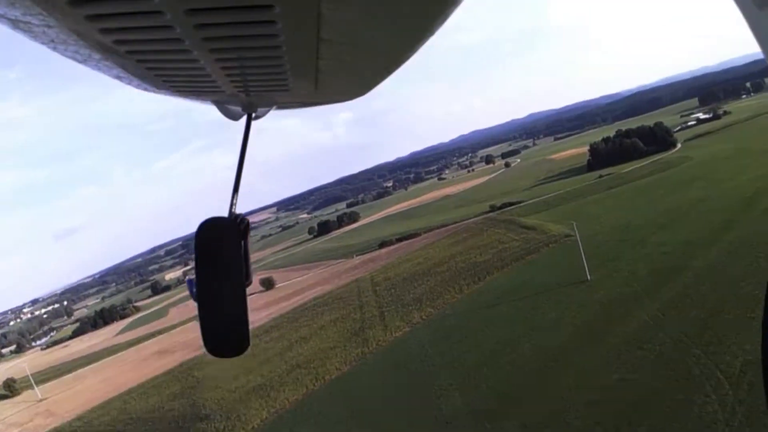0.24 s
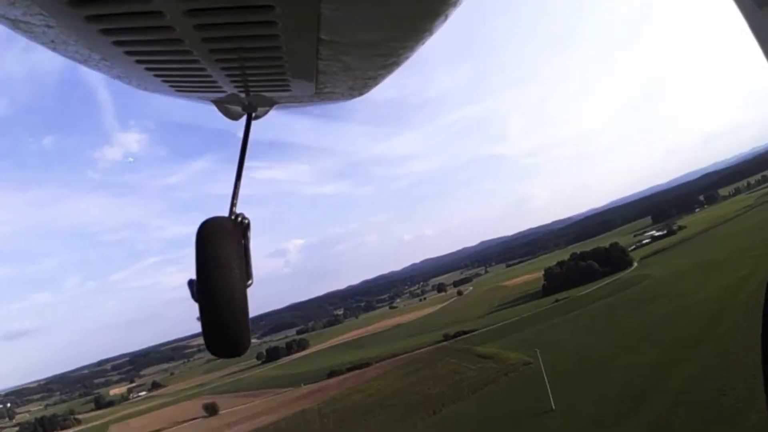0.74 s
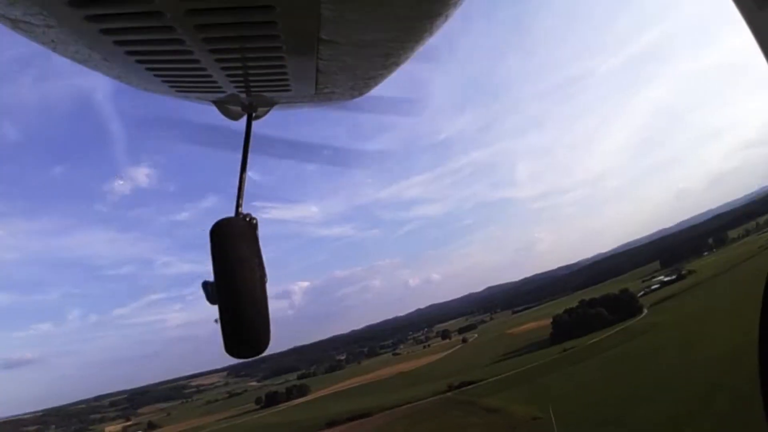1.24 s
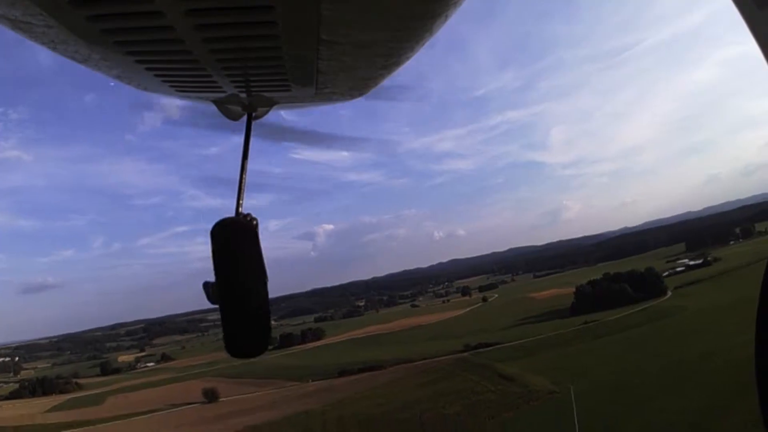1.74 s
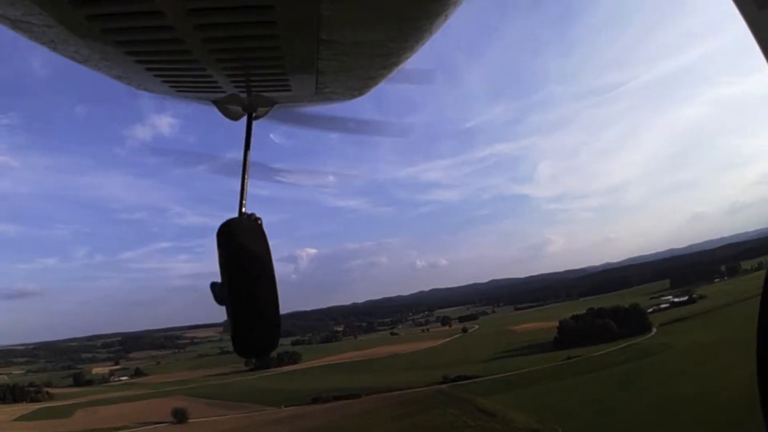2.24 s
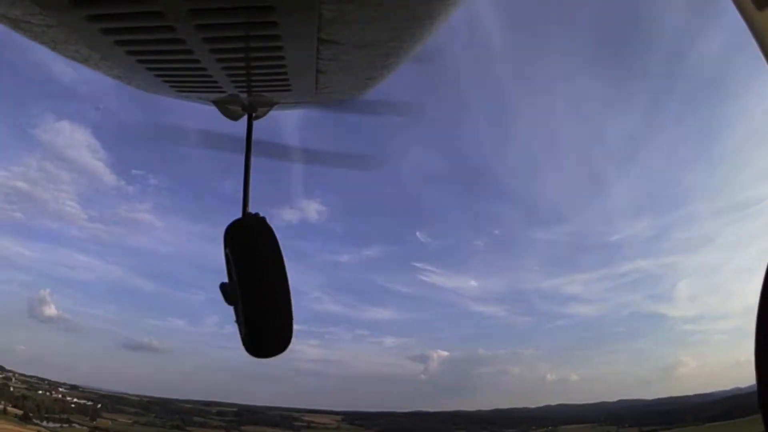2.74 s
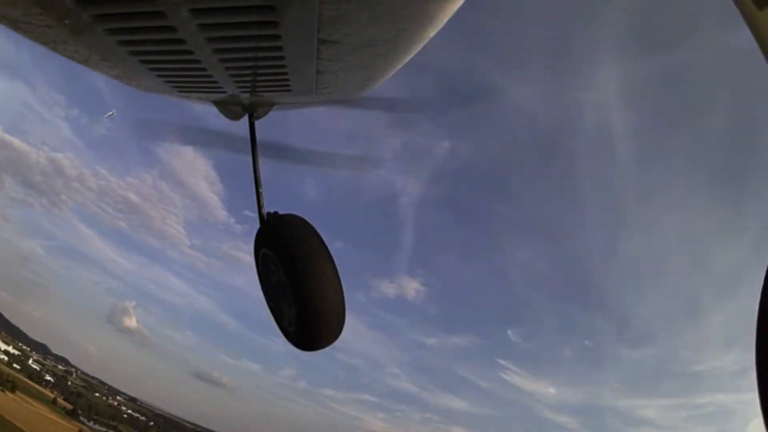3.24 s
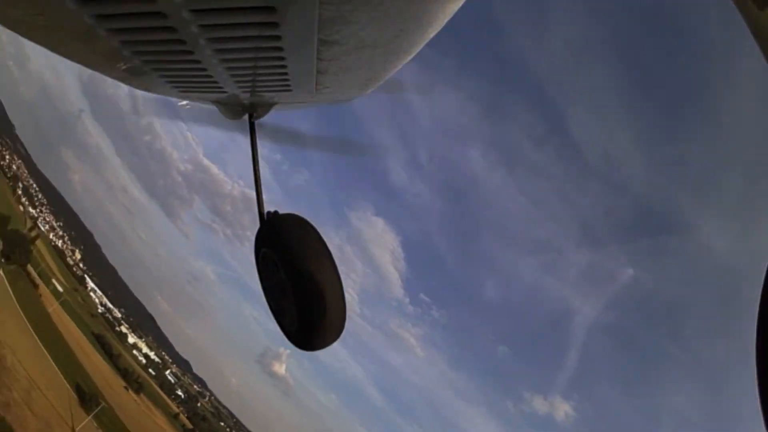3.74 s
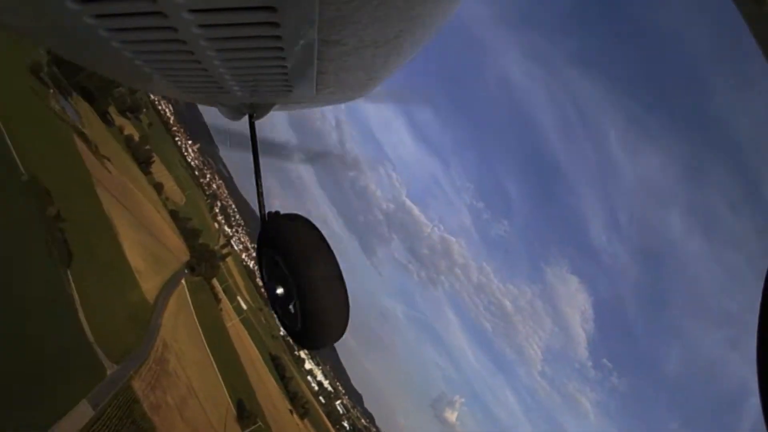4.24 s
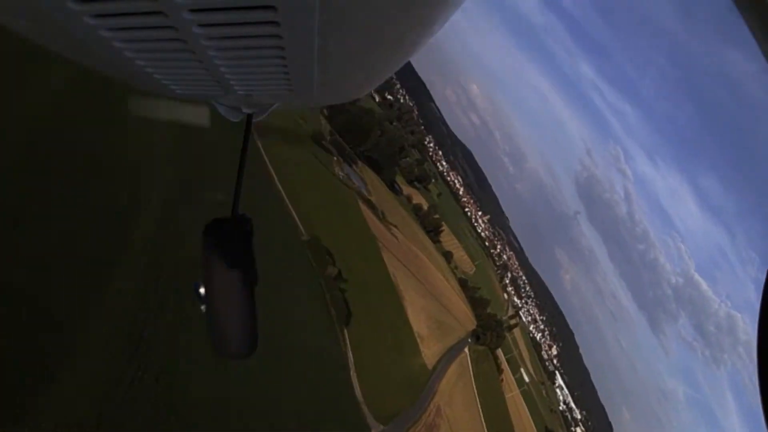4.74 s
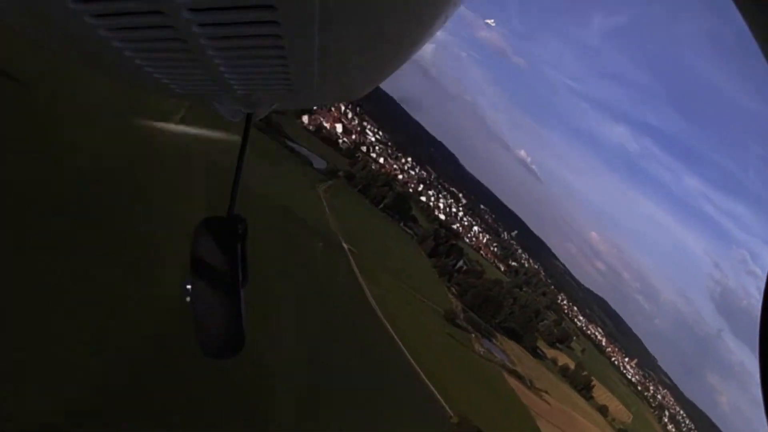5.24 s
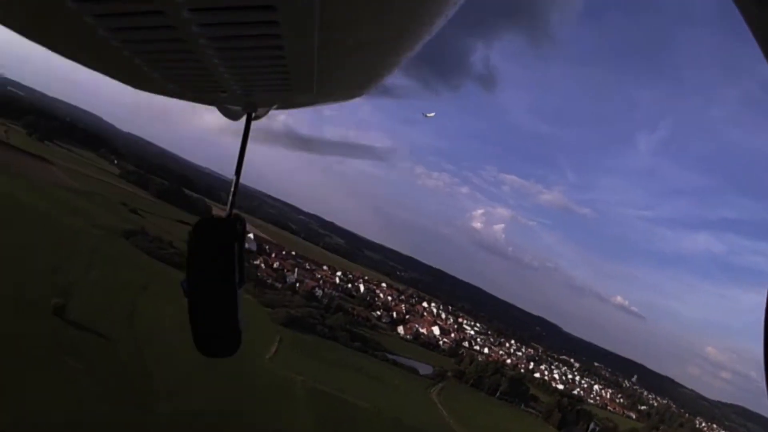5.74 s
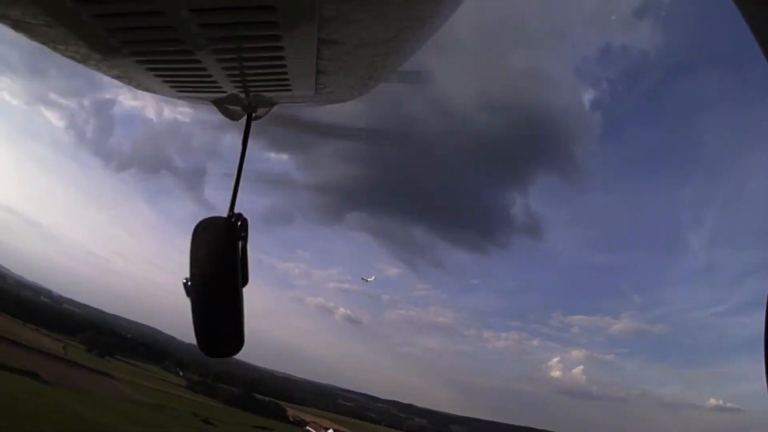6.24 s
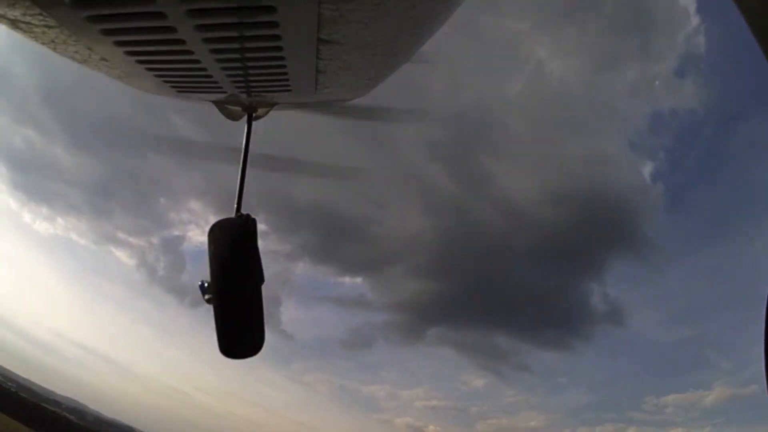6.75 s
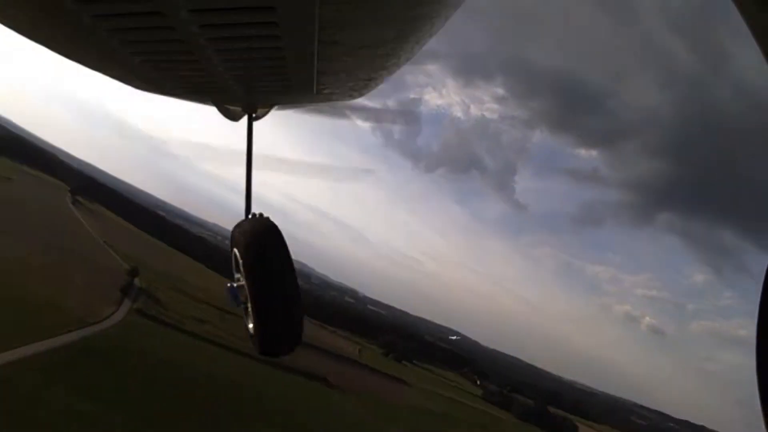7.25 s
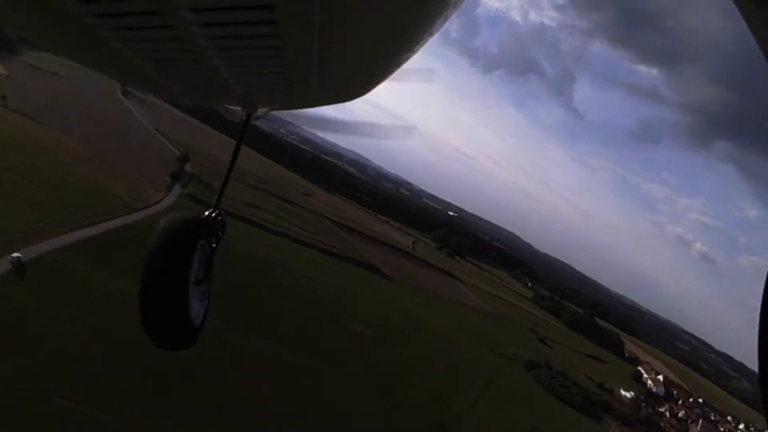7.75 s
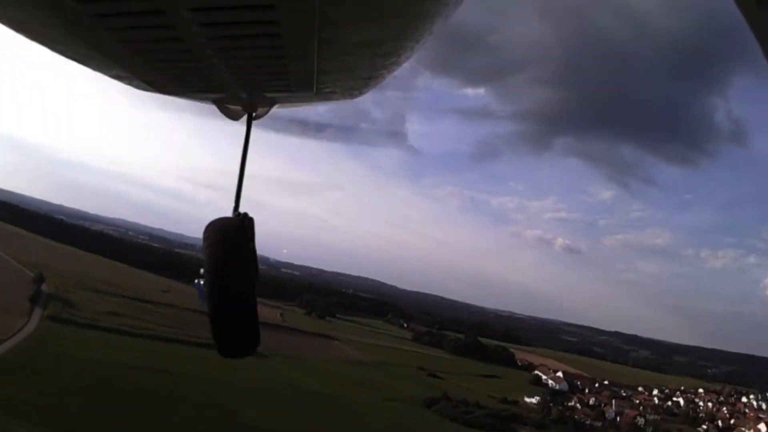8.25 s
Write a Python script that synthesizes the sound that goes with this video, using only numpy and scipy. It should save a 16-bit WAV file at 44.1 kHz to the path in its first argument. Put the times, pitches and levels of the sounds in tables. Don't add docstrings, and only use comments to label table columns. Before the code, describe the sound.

In open air, a small microphone fixed just behind a model plane's propeller picks up a dense, steady electric drone at full throttle, low and buzzing with a metallic whine on top, under rumbling, hissing wind. It holds until about 3 s, then the pitch slides down, the blades soften and the air noise thins. Small dry ticks patter around 3.3 to 3.7 s while a thin, constant high whistle emerges. The drone is slowest around 4.5 to 4.7 s; from 4.2 to 4.95 s a loose part buzzes in a harsh, bright, irregular rattle, by far the sharpest sound. From about 4.8 s the motor climbs modestly, blades and wind growing fuller, and holds from 6.3 s. A duller, weaker rattle comes at 7.3 to 7.8 s. Then the pitch rises again, the whistle fades and the wind surges to the end at 8.5 s, still just below its opening pitch.

```python
import sys
import numpy as np
from scipy import signal
from scipy.fft import rfft, irfft
from scipy.io import wavfile
from scipy.ndimage import uniform_filter1d

SR = 44100
rng = np.random.default_rng(int(sys.argv[2]) if len(sys.argv) > 2 else 0)


def persist_wave(psi):
    counts = np.round(np.clip(psi, -1, 1) * 32767).astype(np.int16)
    wavfile.write(sys.argv[1], SR, np.atleast_2d(counts).T)


def invert_db(x):
    u = np.asarray(x, float) / 20
    return 10 ** u


N = 374850

SWITCH_HZ = 7840.0
FULL_SPEED = 150

# start_s, speed [turns per s]
THROTTLE = [(0, 150.67), (2.767, 150.3), (3.06, 149.95), (3.258, 131.97), (3.385, 123.91), (3.652, 123.47),
            (3.955, 116.16), (4.511, 110.13), (4.805, 122.17), (4.964, 123.72), (5.483, 122.53),
            (5.76, 128.2), (6.138, 128.21), (6.306, 132.97), (7.189, 131.87), (7.67, 132.13),
            (7.866, 142.66), (8.5, 144.4)]
# start_s, level_db
BLADE_LOAD = [(0, -33), (1.8, -39), (2.6, -36.5), (2.9, -47), (3.5, -51), (3.85, -55.5), (4.3, -64),
              (4.6, -52), (4.85, -52), (5.0, -49), (5.45, -39), (5.8, -37.5), (6.5, -42.5), (6.95, -40),
              (7.9, -43), (8.2, -37), (8.5, -41.5)]
# pitch_hz, level_db
UNBALANCE = [(113, -42.5), (117, -53), (121, -75), (123, -53), (127.5, -40), (131, -39), (134, -37.5),
             (150, -39)]
# pitch_hz, level_db
FOURTH = [(450, -57.5), (490, -58), (530, -56.5), (570, -53), (600, -54)]
# pitch_hz, level_db
SIXTH = [(680, -52.5), (720, -58), (765, -72), (795, -57), (830, -77), (860, -45), (880, -63), (900, -57)]
# pitch_hz, width_hz, gain_db
AIRFRAME = [(1421, 68, 9.5), (1634, 120, 2.5), (1727, 170, -3.5), (1990, 150, -15), (2616, 155, -3.5),
            (3220, 330, -10.5), (5490, 330, 3)]
# start_s, level_db
WHISTLE = [
    (2.9, -95),
    (3.1, -67),
    (3.2, -56),
    (3.33, -48.5),
    (3.55, -44.8),
    (4.2, -41.7),
    (6.6, -46.4),
    (7.7, -46.2),
    (8.5, -58),
]
# start_s, end_s, rate [taps per s], level_db
BUZZ = [(4.194, 4.21, 140, -33), (4.23, 4.25, 130, -30), (4.254, 4.274, 290, -31), (4.299, 4.301, 230, -27),
        (4.331, 4.345, 280, -24.5), (4.347, 4.367, 300, -34), (4.374, 4.404, 41, -25),
        (4.425, 4.44, 240, -37), (4.438, 4.498, 290, -22.5), (4.498, 4.516, 120, -30),
        (4.519, 4.613, 340, -23.5), (4.61, 4.709, 315, -23), (4.71, 4.752, 200, -33),
        (4.734, 4.81, 270, -24), (4.799, 4.88, 290, -24), (4.89, 4.948, 110, -37),
        (7.278, 7.392, 160, -30.5), (7.37, 7.418, 186, -30), (7.433, 7.522, 140, -31),
        (7.566, 7.646, 184, -31), (7.662, 7.704, 160, -36), (7.754, 7.804, 143, -30),
        (7.394, 7.683, 110, -35)]
# pitch_hz, width_hz, level_db
TAP_LOW = [(1410, 200, -2.5), (2370, 500, -6.5), (3120, 360, -1)]
# pitch_hz, width_hz, level_db
TAP_HIGH = [(5440, 1200, -12), (7950, 630, -4), (9430, 1000, -17)]
# start_s, level_db
TICKS = [(3.318, -46), (3.334, -48), (3.418, -47), (3.45, -48), (3.478, -47), (3.513, -47), (3.65, -52),
         (3.7, -52)]
# pitch_hz, width_hz, level_db
TICK_RING = [(5050, 350, 6), (5700, 500, 2)]
# pitch_hz, level_db [dB per Hz]
RUMBLE = [(20, -58), (35, -58), (100, -57), (180, -62), (280, -64), (380, -67), (520, -72), (750, -82),
          (1150, -76.5), (1480, -78), (1700, -88), (1950, -92)]
# pitch_hz, level_db [dB per Hz]
HOUSING = [(2350, -93.5), (2700, -84), (3150, -87), (3500, -94.5), (4900, -99.5), (5450, -90.5),
           (6900, -98), (7700, -88.5), (8300, -100.5), (8800, -102), (9600, -102), (10800, -103),
           (11700, -117), (12600, -125)]
AIR_EDGES_HZ = [12, 200, 750, 1900, 8600, 14000]
# start_s, level_db
AIRFLOW = [(0, .5), (.45, -1), (.9, 2), (1.38, 1.5), (1.62, -1), (2.5, 1.3), (2.78, -4), (3.35, -3.5),
           (3.74, -8), (4.45, -9), (4.95, -7), (5.45, -2), (6.3, -0.7), (6.95, -2), (7.3, -6.5),
           (7.65, -7.5), (8.1, 2.5), (8.5, 3.5)]
# share of airflow, rise [dB per turn per s]
AIR_FOLLOWS = [
    (0.58, 0.05),
    (0.75, 0.26),
    (0.36, 0.1),
    (1.07, 0.07),
    (0.37, 0.06),
]
# pitch_hz, floor_db [dB per Hz], extra_db under the whistle
GATE = [(8490, -112, 13), (8460, -101, 14), (9240, -104, 4), (9750, -105, 0.5), (11140, -106, 0.5),
        (11260, -110, -2), (11860, -112, -1), (11800, -112, -5), (12500, -112, -8)]


def propeller(turns, speed):
    blade, = in_time(BLADE_LOAD)
    fourth = at_hz(FOURTH, 4 * speed) + 2.6 * drift(2.3)
    sixth = at_hz(SIXTH, 6 * speed) + 0.85 * np.maximum(blade + 37, -20)
    orders = {
        1: at_hz(UNBALANCE, speed),
        2: blade,
        3: -47.5 + 0.48 * (speed - FULL_SPEED),
        4: fourth,
        5: fourth - 13,
        6: sixth,
        7: fourth - 9 - 0.18 * (speed - 120) + 1.3 * drift(5.4),
        8: fourth - 6 + 0.43 * (blade + 37),
        10: fourth - 11,
    }
    return sum(tone(k * turns, level_db, waver_db=0.73, rate=5.4) for k, level_db in orders.items())


def motor(turns, speed, whistle):
    ripple_db = 1.2 * switching_depth(whistle)
    floor_db = -71
    teeth = np.maximum(-57.5 + ripple_db + airframe(12 * speed), floor_db)
    magnets = np.maximum(-55.5 + ripple_db + airframe(14 * speed), floor_db - 3)
    steady_db = -67 - np.clip(2.5 * (FULL_SPEED - speed), 0, 7.5)
    commutation = np.maximum(-61 + airframe(42 * speed), steady_db)
    orders = {12: teeth, 14: magnets, 28: magnets - 14, 31: magnets - 24, 35: magnets - 29,
              42: commutation, 84: magnets - 26}
    orders.update({24.66: -79, 29.51: magnets - 17, 33.52: magnets - 26})
    return sum(tone(k * turns, level_db, waver_db=1.0) for k, level_db in orders.items())


def controller(turns, speed, whistle):
    depth_db = switching_depth(whistle) - 0.17 * (in_time(BLADE_LOAD)[0] + 70)
    beat_84 = -46.5 + depth_db + airframe(84 * speed - SWITCH_HZ)
    beat_42 = -49.5 + depth_db + airframe(SWITCH_HZ - 42 * speed)
    switch = SWITCH_HZ * np.arange(N) / SR
    out = tone(switch, whistle, waver_db=0.28)
    out += tone(84 * turns - switch, beat_84)
    out += tone(switch - 42 * turns, beat_42)
    for order, below_db in {-1: -28, 1: -32, 2: -35, 29: -60}.items():
        out += tone(switch + order * turns, whistle + below_db, waver_db=4.0, rate=2.5)
    return out + invert_db(whistle - 25) * resonate(rng.standard_normal(N), [(7650, 700, 2)])


def buzz(turns, speed):
    low, edge, high = np.zeros((3, N))
    for start, end, per_s, level_db in BUZZ:
        chance = rng.standard_normal((60, 2))
        count = np.arange(60)
        s = start + (count + 0.19 * chance[:, 0] * (count > 0)) / per_s
        s = s[s < end]
        at = (s * SR).astype(int)
        swell_db = 3.2 * (np.sin(np.pi * (s - start) / (end - start)) - 0.7)
        blade_db = 1.0 * np.cos(4 * np.pi * turns[at])
        blow = invert_db(level_db + swell_db + 2.65 * chance[:len(at), 1] + blade_db)
        low[at] += blow
        edge[at] += blow * invert_db(0.33 * (speed[at] - 142.5))
        high[at] += blow * invert_db(-12.5 - 0.23 * (speed[at] - speed.min()))
    grit = rng.standard_normal(N)

    def scrape(taps):
        return grit * signal.lfilter([1], [1, -np.exp(-1 / (0.0011 * SR))], taps)

    body = resonate(3.5 * low + 0.31 * scrape(low), TAP_LOW)
    body = body + invert_db(1.5) * band(0.29 * edge + 0.63 * scrape(edge), [3140, 4510])
    inner = band(body + resonate(scrape(high), TAP_HIGH), [1150, 9450])
    top = band(scrape(high), [11000, 12600])
    return invert_db(1.0) * inner + invert_db(-20) * top


def ticks():
    clicks = np.zeros(N)
    s, level_db = np.transpose(TICKS)
    clicks[(s * SR).astype(int)] = invert_db(level_db + 12)
    return resonate(clicks + 1e-18, TICK_RING)


def airflow(turns, speed):
    hz = np.maximum(np.fft.rfftfreq(N, 1 / SR), 1)
    points = np.array([(8, -77), *RUMBLE, *HOUSING, (14000, -140)])
    colour_db = np.interp(np.log(hz), np.log(points[:, 0]), points[:, 1])
    spectrum = rfft(rng.standard_normal(N)) * invert_db(colour_db) * np.sqrt(SR / 2)
    gust = drift(0.37)
    blades = np.cos(4 * np.pi * turns) + 0.81 * np.cos(2 * np.pi * turns)
    below = [1 / (1 + (hz / edge) ** 8) for edge in AIR_EDGES_HZ]
    flow, = in_time(AIRFLOW)
    flutter_db = [0.57, 0.5, 0.95, 0.69, 0.87]
    pulse_db = [0.16, 0.7, 0.15, 0.36, 0.4]
    out = 0
    for k, (share, per_speed) in enumerate(AIR_FOLLOWS):
        level_db = share * flow + per_speed * (speed - FULL_SPEED)
        region = irfft(spectrum * np.sqrt(below[k + 1] - below[k]), N)
        flicker_db = 0.5 * gust + flutter_db[k] * drift(15.0) + pulse_db[k] * blades
        out = out + invert_db(level_db + flicker_db) * region
    return out


def switching_depth(whistle):
    return whistle + 40


def airframe(hz):
    grid = np.arange(0, 8000, 5.)
    power = sum(invert_db(db) ** 2 / (1 + (2 * (grid - at) / width) ** 4) for at, width, db in AIRFRAME)
    return np.interp(hz, grid, 10 * np.log10(power + invert_db(-27) ** 2))


def tone(cycles, level_db, waver_db=0.5, rate=10.0):
    strength = np.sqrt(2) * invert_db(level_db + waver_db * drift(rate))
    return strength * np.sin(2 * np.pi * (cycles + rng.random()))


def drift(rate):
    r = np.exp(-80 * np.pi * rate / SR)
    slow = signal.lfilter([1], [1, -2 * r, r * r], rng.standard_normal(N // 40 + 2002))[2000:]
    return np.interp(np.arange(N) / 40, np.arange(len(slow)), slow / np.std(slow))


def resonate(x, modes):
    out = 0
    for k, (hz, width, level_db) in enumerate(modes):
        r = np.exp(-np.pi * width / SR)
        poles = [1, -2 * r * np.cos(2 * np.pi * hz / SR), r * r]
        ring = signal.lfilter([1 - r * r, 0, r * r - 1], poles, x)
        out = out + (-1) ** k * invert_db(level_db) * ring
    return out


def band(x, edges_hz):
    return signal.sosfilt(signal.butter(5, edges_hz, "band", fs=SR, output="sos"), x)


def in_time(rows):
    s, *columns = np.transpose(rows)
    return [np.interp(np.arange(N) / SR, s, c) for c in columns]


def at_hz(points, hz):
    return np.interp(hz, *np.transpose(points))


def scene():
    asked, = in_time(THROTTLE)
    keep = np.exp(-1 / (0.2228 * SR))
    speed = asked[0] + signal.lfilter([1 - keep], [1, -keep], asked - asked[0])
    turns = np.cumsum(speed) / SR
    whistle, = in_time(WHISTLE)
    mix = propeller(turns, speed) + motor(turns, speed, whistle) + controller(turns, speed, whistle)
    mix = mix + buzz(turns, speed) + ticks() + airflow(turns, speed)
    return mix[None]


def roll_off(x):
    return signal.sosfilt(signal.butter(12, 12470, fs=SR, output="sos"), x)


def record(dry):
    hz, s, bins = signal.stft(dry, SR, nperseg=1024, noverlap=512)
    whistle = np.interp(s, *np.transpose(WHISTLE))
    edge, floor_db, mask_db = np.transpose(GATE)
    masking = np.clip((whistle + 54) / 12, 0, 1)
    gate_db = np.interp(hz, edge, floor_db, left=-200)[:, None]
    gate_db = gate_db + np.interp(hz, edge, mask_db)[:, None] * masking
    heard = np.mean(np.abs(bins[0, (hz > 2000) & (hz < 4700)]) ** 2, axis=0)
    loud_db = 10 * np.log10(uniform_filter1d(heard, size=24))
    follows = 0.38 * np.clip((hz[:, None] - 9450) / 300, 0, 1)
    gate_db = gate_db + follows * (loud_db - np.median(loud_db))
    power = uniform_filter1d(np.abs(bins) ** 2, size=6, axis=1)
    power = uniform_filter1d(power, size=3, axis=2) * 2 / (1.5 * hz[1])
    kept = bins * (power > invert_db(gate_db) ** 2)
    mix = signal.istft(kept, SR, nperseg=1024, noverlap=512)[1][:, :N]
    return roll_off(mix)


dry = scene()
out = record(dry)
persist_wave(out)
```